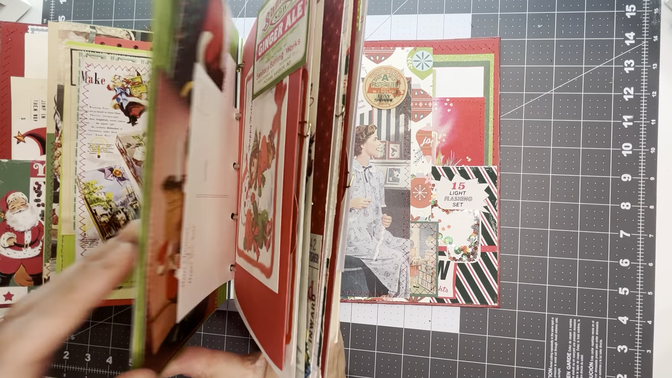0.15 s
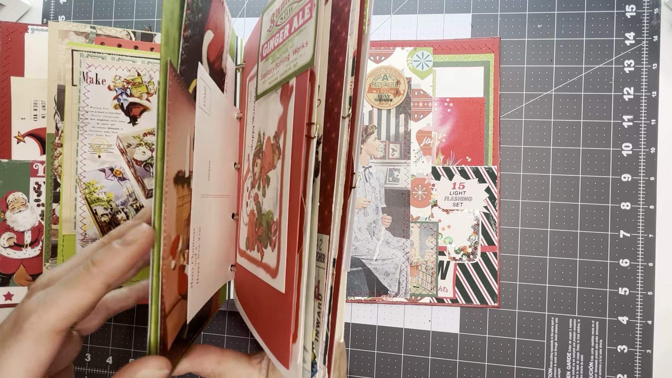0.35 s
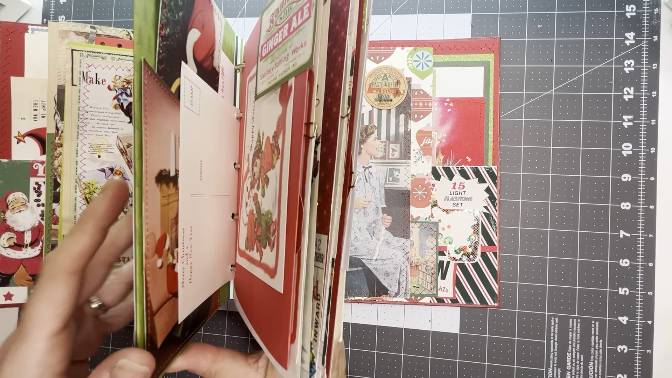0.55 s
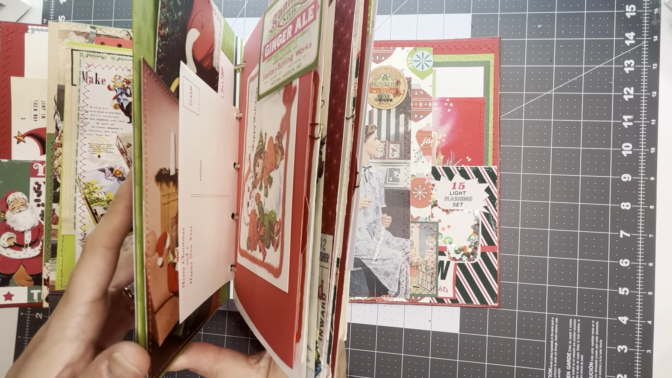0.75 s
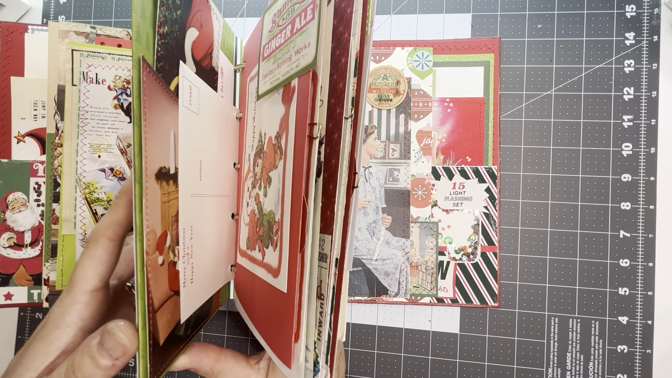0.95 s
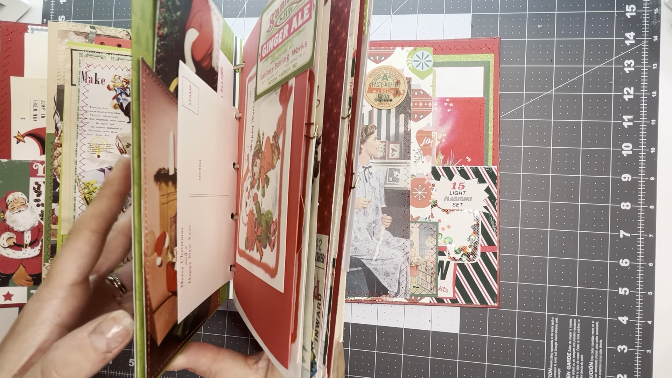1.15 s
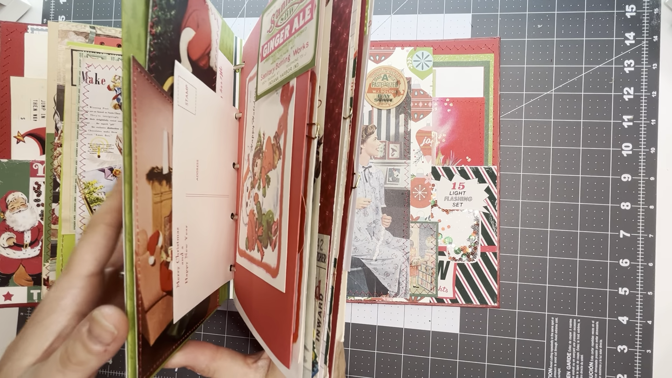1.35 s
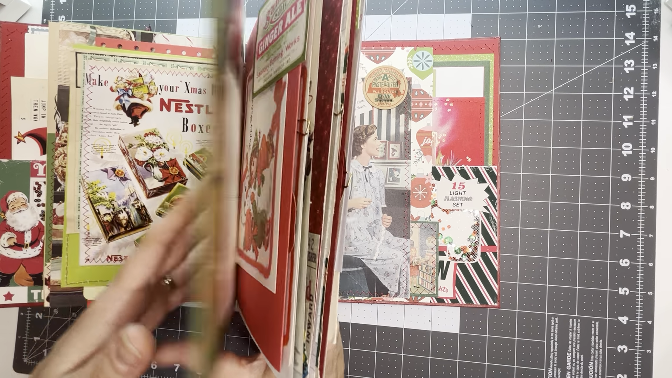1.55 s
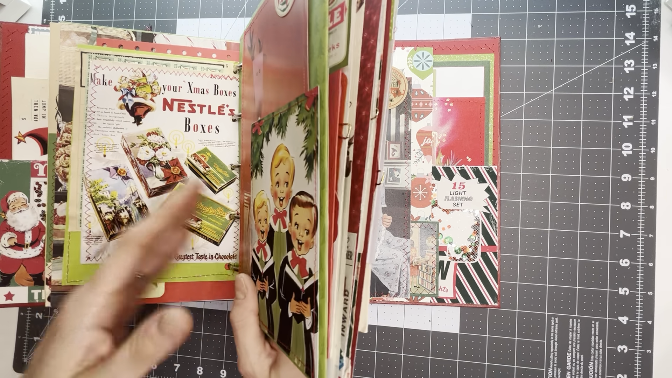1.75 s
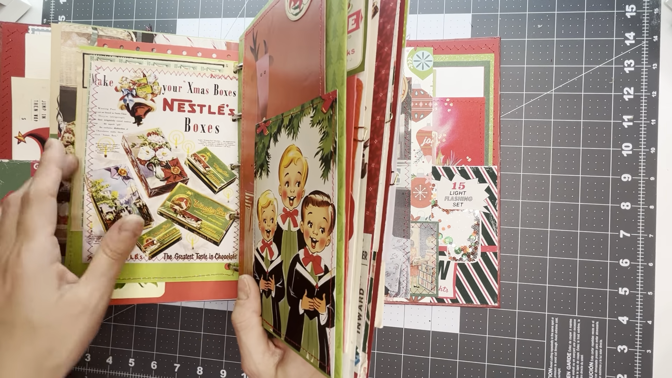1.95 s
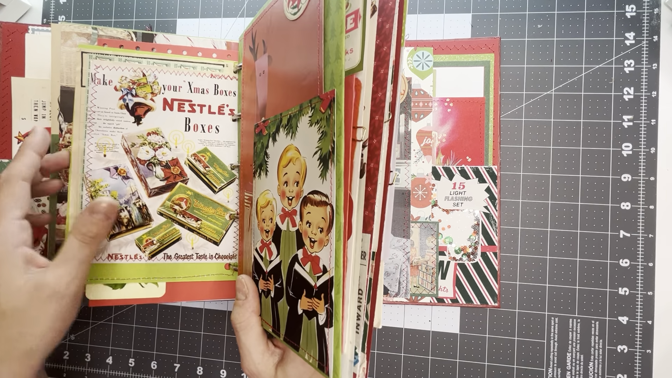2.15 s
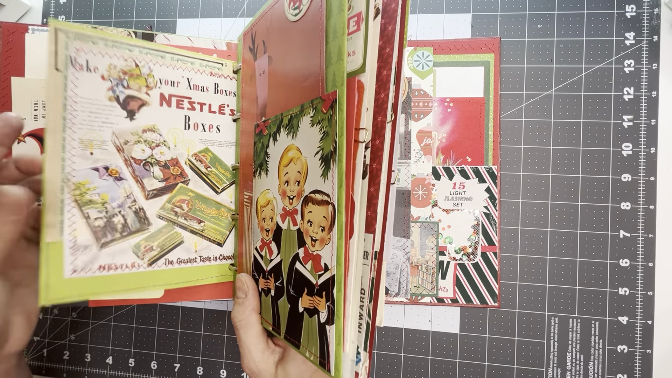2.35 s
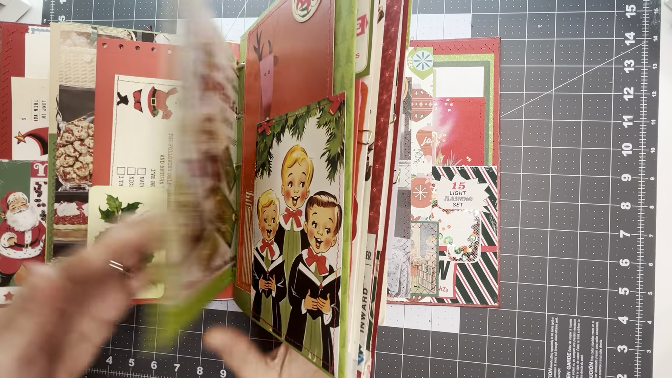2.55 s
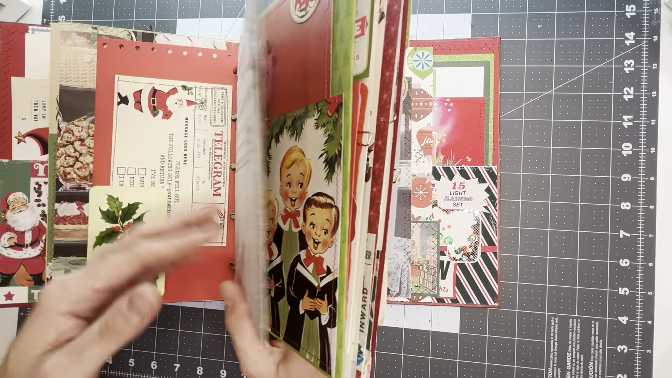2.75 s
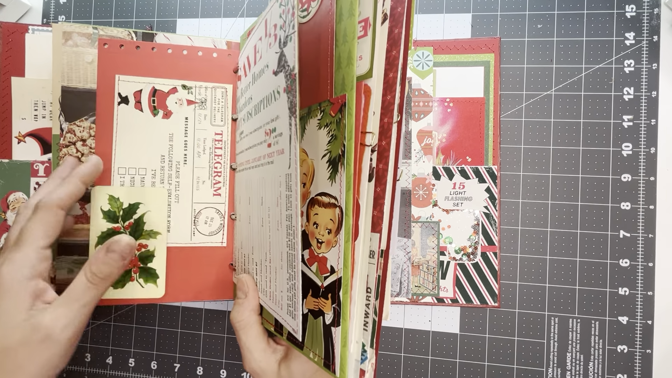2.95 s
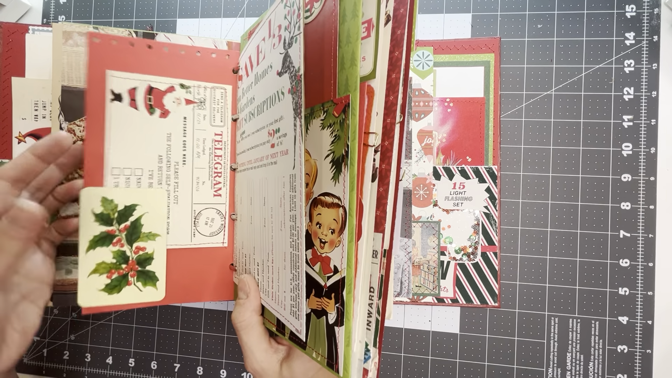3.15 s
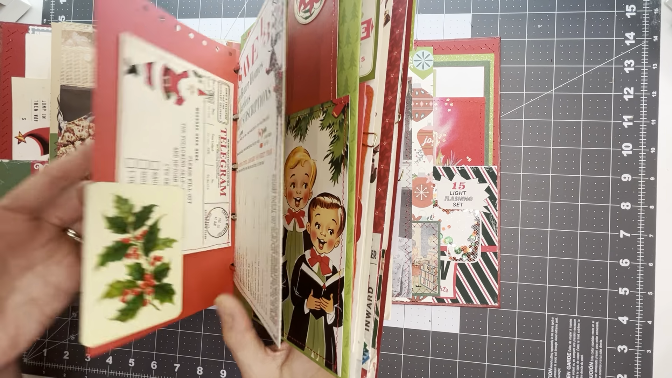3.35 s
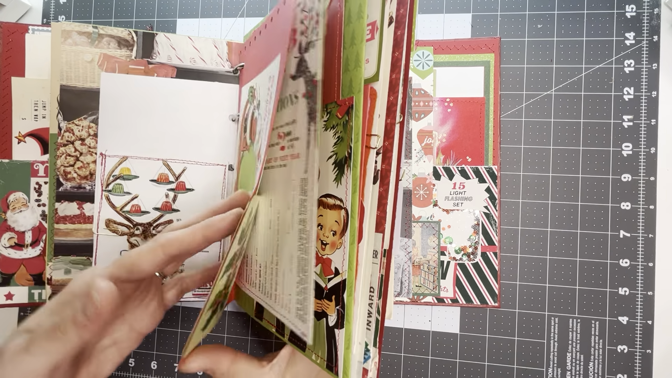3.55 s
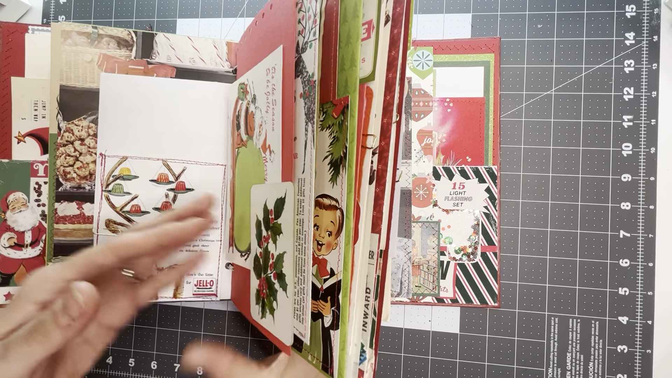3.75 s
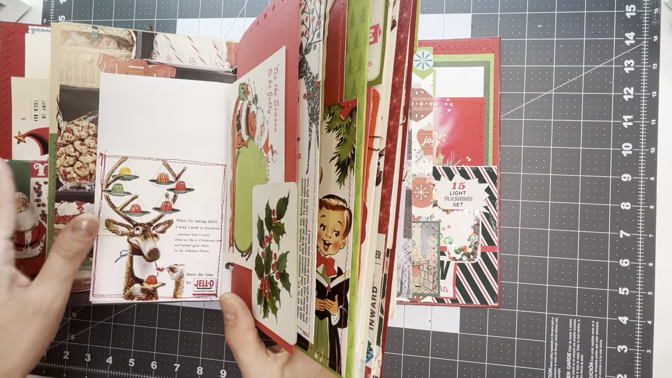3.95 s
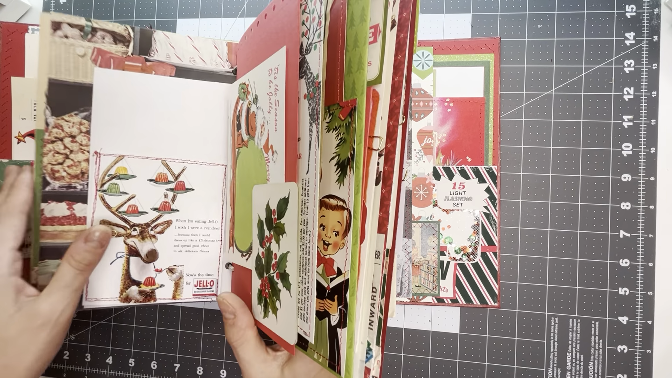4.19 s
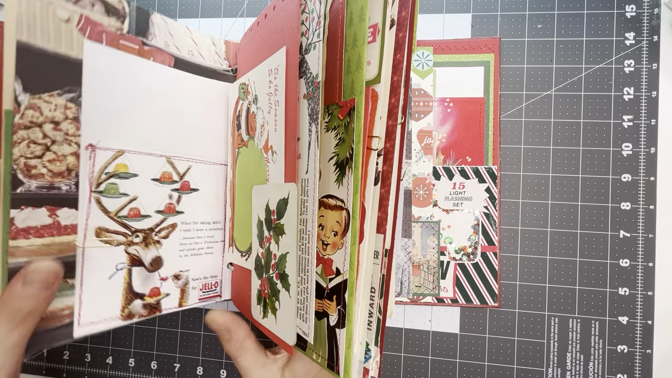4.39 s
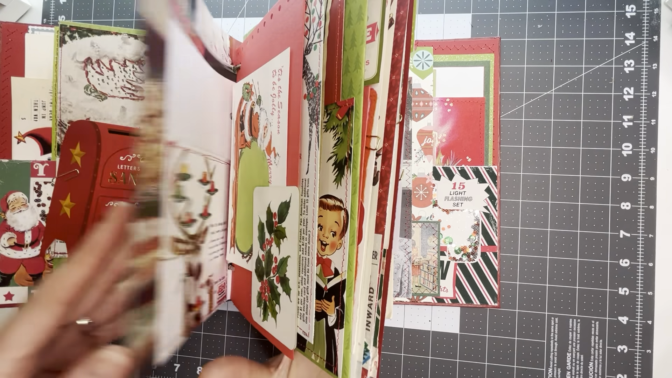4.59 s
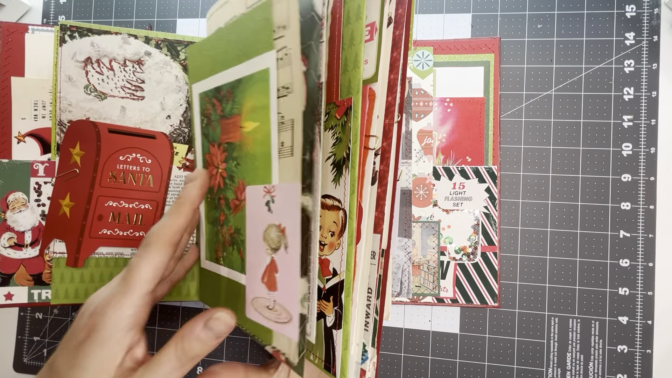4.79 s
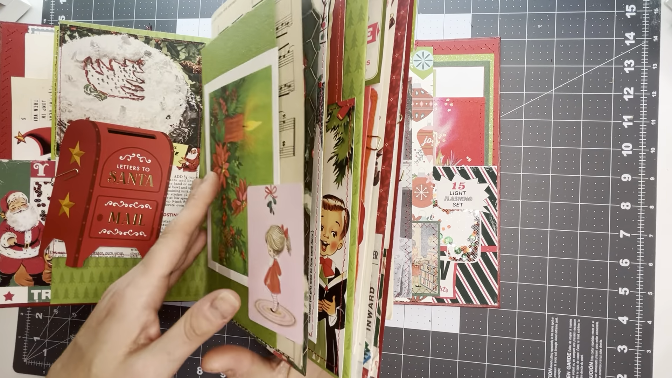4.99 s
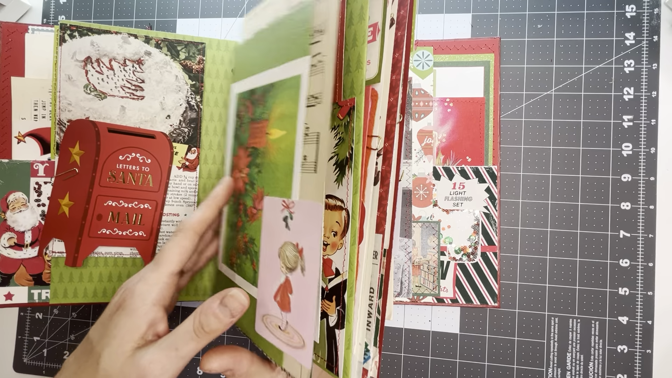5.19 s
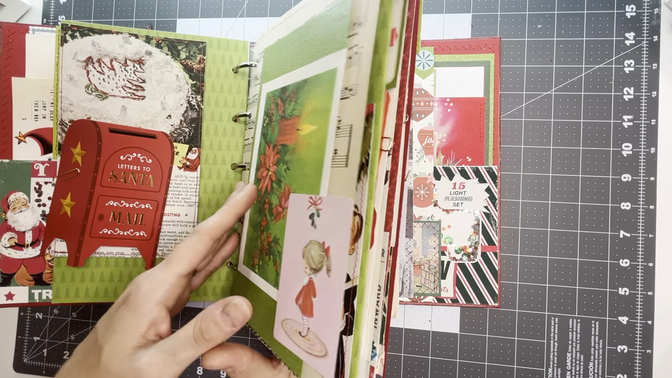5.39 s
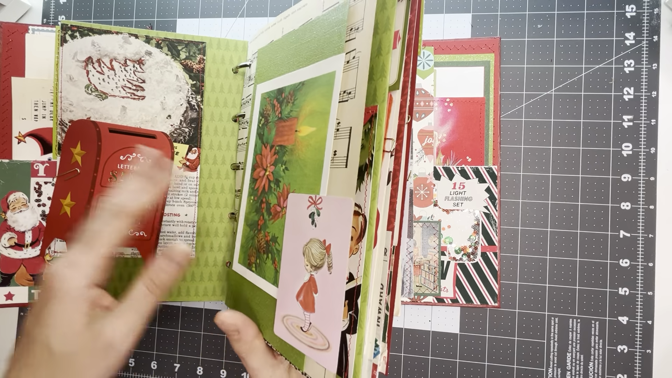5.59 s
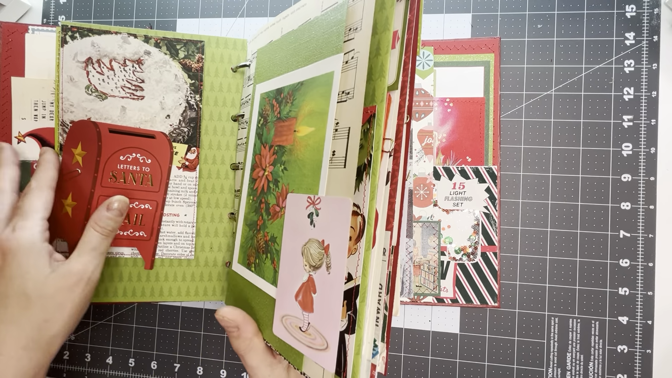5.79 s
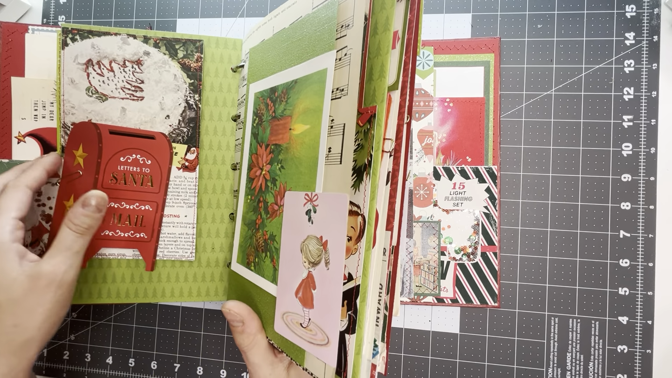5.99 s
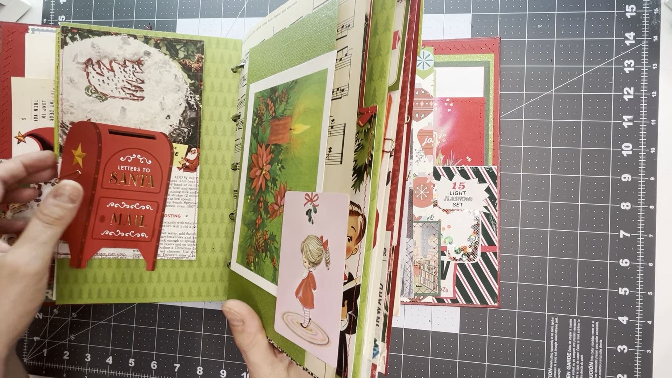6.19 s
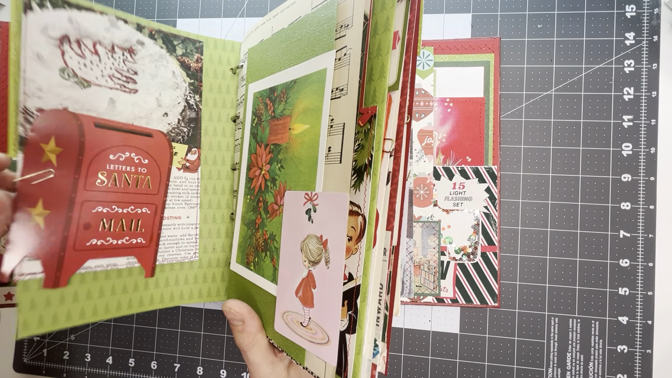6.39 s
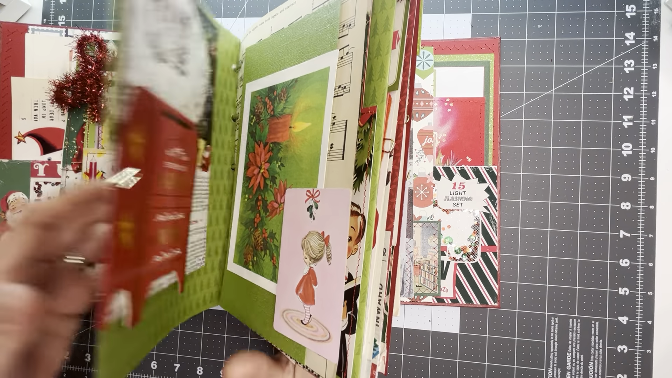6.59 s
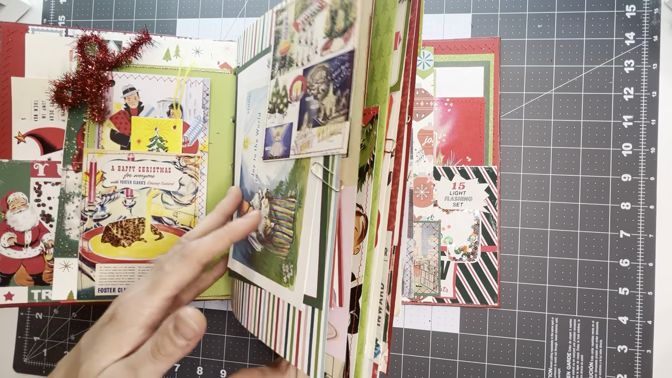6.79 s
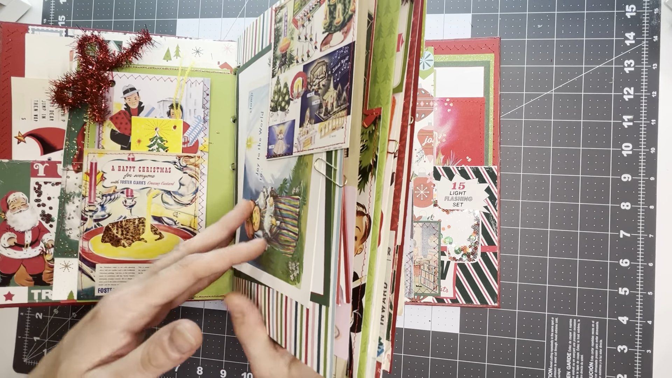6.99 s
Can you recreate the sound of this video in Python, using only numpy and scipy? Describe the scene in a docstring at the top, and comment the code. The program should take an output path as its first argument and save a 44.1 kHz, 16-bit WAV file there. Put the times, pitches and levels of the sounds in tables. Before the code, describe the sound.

Hands turn the paper and card pages of a ring binder on a table, heard close up in stereo. Right at the start a sheet slides and flicks free with a soft bump. Light handling follows, with small ticks and rustles from about 1 to 1.9 seconds. At 2.3 seconds comes the loudest moment: a page cracks sharply, slaps the stiff cover and thumps the tabletop, trailing into a short rustle. Sheets rub and flex again around 3.5 seconds and from 4.5 to 5.3 seconds, with little snaps, edge flicks and dull knocks on the table. A lull follows, holding only faint brushing and a few low bumps. Another page starts moving at about 6.4 seconds and lands at 6.7 in a quick flurry of snaps and hollow slaps. A quiet room's faint hum and hiss lie under everything.

```python
"""Hands turn the paper and card pages of a ring binder on a table, close to a pair of microphones.
A first sheet slides and flicks free, and light handling follows. At 2.3 s a page cracks, slaps the
cover and thumps the table top. Sheets rub and flex again around 3.5 s and from 4.5 to 5.3 s; after
a lull, a last flurry of snaps lands at 6.7 s. A quiet room's faint hum and hiss lie under it all."""
import sys
import numpy as np
from scipy import signal
from scipy.fft import rfft, irfft, next_fast_len
from scipy.io import wavfile
from scipy.ndimage import uniform_filter1d

SR = 44100
rng = np.random.default_rng(int(sys.argv[2]) if len(sys.argv) > 2 else 0)


def to_wav(s):
    """Save 16-bit WAV."""
    ch = np.atleast_2d(s).T  # columns
    pcm = np.round(np.clip(ch, -1, 1) * 32767)  # PCM
    wavfile.write(sys.argv[1], SR, pcm.astype(np.int16))


N = 310370

# One sheet slides on another; rise and fall are times per 20 dB, their signs ignored:
# hold_start_s, hold_s, level_db, rise_s, fall_s, bass_lift_db, treble_lift_db, presence_lift_db
STROKES = [(0.032, 0.0566, -59.5, -0.46, 0.1481, 3.5, 6, 8),
           (0.088, 0.03413, -53.5, 0.017, 0.0568, 1, 2, 10.5),
           (0.139, 0.01759, -43.5, 0.0408, 0.0497, 0, -0.5, 7.5),
           (0.174, 0.027, -47.5, 0.0522, 0.0164, 7.5, -0.5, 7),
           (0.266, 0.001062, -56.5, 0.183, 0.0428, 4, 0.5, 6),
           (0.414, 0.07587, -58.5, 0.1409, 0.0253, -5.5, -3, 1.5),
           (0.531, 0.0795, -72, 0.4441, 0.1843, -3.5, 11.5, -0.5),
           (0.601, 0.04908, -67, 0.0624, 0.1587, -4, 1, -0.5),
           (0.781, 0.03165, -68, 0.0746, 0.1829, 2.5, 2, 8.5),
           (0.845, 0.0776, -60, 0.0726, 0.0592, 4, 8, 3.5), (1.01, 0.0254, -52.5, 0.0061, 0.042, 5, 4, 2),
           (1.115, 0.00791, -53, 0.0342, 0.0142, 2.5, -3.5, 2),
           (1.136, 0.023385, -52.5, -0.0138, 0.0272, 5.5, -0.5, 5.5),
           (1.239, 0.03515, -65.5, -0.026, 0.019, -6, 6.5, 5),
           (1.29, 0.01477, -61.5, -0.0008, 0.1197, -12, 5, 2),
           (1.434, 0.00887, -53, 0.0262, 0.0692, 6.5, -2, 7),
           (1.485, 0.03568, -44, 0.0459, 0.0915, 1.5, 3, 6.5),
           (1.609, 0.02317, -54, 0.0229, 0.0552, 6, 15, 5),
           (1.649, 0.008146, -42.5, 0.0342, 0.0352, 9.5, 4.5, 7),
           (1.673, 0.0398, -62, 0.055, 0.0794, 13.5, 8, 7),
           (1.866, 0.01709, -69.5, 0.09, 0.0917, 3.5, 1.5, 2),
           (1.94, 0.0387, -75, 0.3641, -0.0042, 0, 3.5, -2),
           (2.049, 0.02812, -73, 0.2477, 0.0972, -2.5, 6, -2),
           (2.138, 0.0228, -66.5, 0.033, 0.075, 0, -5, 0),
           (2.163, 0.01328, -63.5, 0.0263, 0.0366, 5, 0.5, 7),
           (2.308, 0.00909, -52.5, 0.01, -0.0148, -2, -6.5, 3),
           (2.322, 0.001152, -32, 0.01, 0.0257, 3, -9.5, 3.5),
           (2.351, 0.000968, -56, 0.0365, 0.1864, 14.5, 3.5, 9.5),
           (2.478, 0.13984, -51, 0.0755, 0.038, 11, 4, 6.5),
           (2.758, .001, -72.5, 0.1673, -0.1543, 0.5, 6, -0.5),
           (2.848, 0.000948, -58, 0.0604, 0.0365, -0.5, 5, 3),
           (2.927, 0.01096, -69, -0.1891, 0.2175, 2, 2, -1),
           (2.972, 0.03015, -61, -0.1622, 0.1039, -11.5, -7.5, -5),
           (3.005, 0.0155, -54.5, 0.0255, 0.0198, -9.5, -6, 5.5),
           (3.171, 0.0406, -61.5, 0.0426, 0.0968, -3, 0.5, -0.5),
           (3.22, 0.02084, -56, 0.0685, 0.0562, 16.5, 3, 0),
           (3.303, 0.0271, -61, 0.0614, 0.1028, 13.5, 9, 4.5),
           (3.355, 0.000968, -46.5, 0.0304, 0.0737, -1, -11, -6),
           (3.434, 0.02467, -53, 0.0353, 0.1526, 10.5, 2, 6.5),
           (3.462, 0.03657, -46, -0.0011, -0.0339, 6, 1, 10),
           (3.496, 0.0228, -41.5, 0.0147, 0.0534, 2, 6.5, 8),
           (3.578, 0.03684, -42, -0.0004, 0.0473, 0.5, 7, 8.5),
           (3.544, 0.0467, -51.5, 0.0347, 0.0731, 11, 8.5, 6),
           (3.634, 0.05086, -54.5, 0.0472, 0.0237, 9.5, 3, 4),
           (3.996, 0.00097, -77.5, 0.4911, -0.3488, 1, 3, 0.5),
           (4.049, 0.00096, -67.5, -0.1306, 0.0194, -5, -5, 3.5),
           (4.094, 0.03136, -73, 0.076, 0.0976, 2.5, 15, 1.5),
           (4.198, 0.00096, -79.5, -0.4826, -4.0389, 5.5, 3, 4),
           (4.345, 0.09236, -62, -0.02, 0.1079, 13.5, 2.5, 11),
           (4.487, 0.0433, -58, 0.0644, 0.1863, 3, 7, 7.5),
           (4.557, 0.10512, -54.5, 0.0241, 0.0704, -0.5, 7, 9),
           (4.699, 0.000895, -51.5, 0.0681, 0.0286, 10, -0.5, 3),
           (4.749, 0.001005, -43, -0.0188, 0.0231, 1, 2.5, 4.5),
           (4.79, 0.0008545, -60.5, -0.0034, 0.1323, 7.5, 7, 12),
           (4.963, 0.0272, -62, 0.0062, 0.1463, 5.5, 8, 7),
           (5.018, 0.0418, -58.5, 0.0229, 0.1378, 9.5, 3.5, 7.5),
           (5.13, 0.03545, -50, 0.0126, 0.0969, 9.5, 1.5, 2.5),
           (5.184, 0.08265, -47, 0.0514, 0.0116, 6.5, 4, 6),
           (5.281, 0.033324, -54.5, 0.0325, 0.0165, 10, 10.5, 11),
           (5.349, 0.06687, -68.5, 0.0728, 0.0516, 17.5, 9.5, 4),
           (5.491, 0.08243, -75, 0.0223, -0.067, -7, 17, 10.5),
           (5.781, 0.01768, -74.5, -0.0388, -0.0583, 5.5, -3, 0.5),
           (5.832, 0.10132, -67.5, -0.1054, -0.0397, 1.5, 4.5, 1),
           (6.08, 0.01989, -79.5, -0.297, -0.0185, -6.5, 1, 4),
           (6.233, 0.00103, -69, 0.0258, 0.1992, 9.5, 2, -1),
           (6.267, 0.01778, -71.5, 0.0287, -0.7093, 9, 5.5, 4.5),
           (6.369, 0.02654, -63, -0.0052, 0.1012, 11.5, -0.5, 6.5),
           (6.432, 0.000997, -56, 0.0355, 0.0542, 11.5, -11.5, 5),
           (6.461, 0.1192, -62, -0.0145, 0.3307, 4, 8, 9),
           (6.597, 0.03863, -55, 0.0269, 0.1162, 9.5, 6.5, 6.5),
           (6.637, 0.0491, -50, -0.0035, 0.0552, 8.5, 3, 12.5),
           (6.685, 0.0516, -42, 0.0173, 0.0161, 7.5, 0, 15),
           (6.739, 0.02926, -50, -0.0218, 0.0568, 4.5, -5.5, 4),
           (6.821, 0.03999, -68, -0.0304, 0.1054, 2.5, 2.5, 12),
           (6.889, 0.09955, -77, -0.4239, -0.0862, -5.5, 19.5, 8)]
# Tone of rubbing paper: frequency_hz, relative_db
PAPER_TONE = [(150, -2.5), (300, -12), (530, 2), (720, -10), (960, 6.5), (1300, 3), (1800, 1.5), (2400, -3),
              (3400, -4.5), (4400, -1), (5600, -2.5), (7000, -8.5), (11000, -12), (16000, -16)]
# A sheet buckles or lands: start_s, level_db, pitch_hz, rattle_share
SNAPS = [(.107, -32.5, 1006, 0.15), (.1075, -29.5, 3381, 0.13), (.1424, -33, 2518, 0.38),
         (.146, -29, 941.4, 0.31), (.152, -36, 2092, 0.52), (0.9643, -50.5, 1056, 0.3),
         (1.0097, -50, 1703, 0.02), (1.1161, -48, 3552, .43), (1.163, -38, 987.5, 0.23),
         (1.4328, -41.5, 996.2, 0.61), (1.4809, -36, 1147, 0.47), (1.654, -32, 368.2, 0.8),
         (1.662, -32.5, 3410, 0.48), (1.7037, -36.5, 2826, .3), (1.867, -30.5, 2581, 0.04),
         (1.8728, -41.5, 2461, 0.09), (2.0509, -54, 3048, .3), (2.1622, -43.5, 1487, .4),
         (2.32, -15, 2507, .2), (2.3249, -7.5, 3262, 0.12), (2.3278, -22.5, 961.3, .33),
         (2.4472, -40, 534.6, .4), (2.4632, -34, 572.8, 0.08), (2.4805, -31.5, 1025, 0.4),
         (2.5086, -34.5, 908, .54), (2.6177, -34, 716.4, 0.32), (2.618, -37, 1597, 0.12),
         (2.754, -56.5, 1370, 0.44), (2.8431, -48.5, 1780, 0.19), (2.9232, -57.5, 2720, 0.35),
         (3.011, -43.5, 2770, 0.06), (3.1102, -56, 875, 0.31), (3.2282, -35, 559, .42),
         (3.229, -44.5, 1399, 0.09), (3.245, -38.5, 1291, 0.26), (3.28, -50, 1398, 0.15),
         (3.312, -44, 1159, 0.49), (3.3528, -36, 2707, 0.39), (3.46, -39, 933.4, .7),
         (3.4787, -30, 2446, 0.53), (3.501, -26.5, 2876, 0.63), (3.582, -34.5, 2254, .2),
         (3.6821, -35.5, 528, 0), (4.037, -51, 3074, 0.42), (4.0931, -53, 2650, 0.39),
         (4.3583, -44.5, 964.1, 0.71), (4.3742, -42.5, 935, 0.71), (4.5886, -35.5, 1052, 0.55),
         (4.61, -37.5, 1451, 0.26), (4.635, -32, 2541, 0.47), (4.6949, -30.5, 1448, 0),
         (4.7448, -30, 1128, 0.1), (4.748, -35, 1176, .6), (4.7527, -41.5, 1186, 0.75),
         (4.7681, -33.5, 1104, 0.35), (4.9665, -40.5, 976.6, 0.32), (5.0307, -32.5, 984, 0.24),
         (5.1277, -45.5, 1004, 0.53), (5.159, -36.5, 1040, 0.43), (5.189, -37, 1092, 0.54),
         (5.254, -39, 1112, 0.57), (5.2858, -41, 478.8, 0.61), (5.2934, -41.5, 535, 0.23),
         (5.7519, -59, 949.8, 0.39), (5.843, -51.5, 2690, 0.77), (6.2323, -49.5, 994, 0.06),
         (6.428, -39.5, 1818, 0.06), (6.4448, -29, 450.2, 0.16), (6.637, -37.5, 2480, 0.31),
         (6.668, -34.5, 2278, 0.8), (6.687, -29.5, 1812, 0.35), (6.7058, -15.5, 2583, .15),
         (6.718, -24, 3437, 0.27), (6.724, -28.5, 3398, .4), (6.7385, -19.5, 3529, 0.34),
         (6.742, -25.5, 2201, 0.59), (6.751, -23.5, 604.1, 0.16)]
# An edge flicks past a finger or another edge: start_s, level_db, centre_hz
EDGE_TICKS = [(0.142, -32, 5128), (0.203, -47.5, 5620), (.782, -59, 5140), (0.795, -54.5, 5220),
              (1.011, -45, 6030), (1.118, -40.5, 4054), (1.3058, -46.5, 4910), (1.527, -49.5, 5490),
              (1.5482, -38, 5180), (1.6178, -37.5, 10280), (1.6621, -51.5, 5280), (1.7041, -43.5, 6757),
              (1.8228, -53.5, 4093), (1.8662, -44.5, 5112), (1.926, -66.5, 4228), (2.32, -24, 5062),
              (2.4637, -39.5, 4297), (2.4816, -40, 5618), (2.5137, -36, 3888), (2.616, -43, 5481),
              (2.7547, -52.5, 6930), (2.843, -44, 9850), (2.848, -49, 5941), (2.8518, -53, 11370),
              (2.924, -56.5, 12510), (3.106, -61, 11930), (3.2432, -51.5, 4590), (3.3538, -43.5, 4560),
              (3.439, -45.5, 6760), (3.4603, -38.5, 7584), (3.862, -66, 7500), (3.869, -64, 6981),
              (3.8752, -62, 5486), (4.045, -55, 4594), (4.0702, -59, 4054), (4.0953, -54, 7190),
              (4.1663, -70.5, 5810), (4.197, -66.5, 6001), (4.2113, -65, 10480), (4.2277, -61, 11340),
              (4.358, -46.5, 8580), (4.3749, -43, 8379), (4.554, -54.5, 6000), (4.635, -44, 9070),
              (4.694, -34, 4313), (4.737, -44.5, 10990), (4.744, -43, 4400), (4.753, -49, 4160),
              (4.7694, -38, 5522), (5.031, -56, 5490), (5.189, -51.5, 5060), (5.2887, -37.5, 5636),
              (5.394, -58, 5000), (5.5806, -63, 9820), (5.7457, -61.5, 12100), (5.842, -57, 5750),
              (6.082, -58, 7230), (6.5028, -48.5, 4885), (6.739, -47, 5327), (6.7414, -47.5, 5340),
              (6.748, -46.5, 5200), (6.9904, -59, 5705)]
# Pages slap the stiff cover: start_s, level_db
COVER_SLAPS = [(.144, -36.5), (1.65, -56), (2.322, -29), (2.513, -30), (3.229, -45), (3.499, -40),
               (3.563, -38.5), (5.189, -40.5), (5.258, -40), (6.69, -35), (6.722, -26.5), (6.749, -26.5),
               (6.79, -45)]
# Ring of the cover board: pitch_hz, relative_db, t60_s
COVER_MODES = [(530, 0, .055), (345, -8, .06), (940, -10, .04)]
# A hand or page knocks the table: start_s, level_db, main_pitch_hz, t60_s, upper_modes_db
THUMPS = [(.159, -36, 108.3, 0.1656, -11.5), (1.067, -40, 118.2, 0.1744, -5.5),
          (1.165, -47, 90.87, 0.1414, 1), (1.461, -43.5, 99.8, 0.1629, -10), (1.66, -35, 114.4, 0.1989, -5),
          (1.985, -52, 98.6, 0.209, -17), (2.166, -35.5, 89.7, 0.1613, -8.5),
          (2.341, -25.5, 113.1, 0.14957, 3.5), (2.488, -38, 120.6, 0.2496, -7),
          (2.53, -40.5, 113, 0.1162, -2.5), (2.929, -44.5, 106.3, 0.1357, -10),
          (3.026, -37.5, 107.2, 0.1415, -19.5), (3.114, -52, 106.7, .18, -18.5),
          (3.218, -44, 121.5, 0.23935, -3), (3.497, -42, 80.75, 0.36, -18.5),
          (3.548, -37.5, 110.9, 0.092, -20), (3.636, -43, 113, 0.2883, -5),
          (4.052, -38.5, 106.8, 0.2446, -12.5), (4.475, -50.5, 107.4, 0.1155, -8),
          (4.755, -47.5, 107.6, 0.2477, -12), (5.017, -41.5, 107.2, 0.0934, -5.5),
          (5.176, -46, 97.83, 0.1737, 2.5), (5.298, -40.5, 110.3, 0.1174, -8.5),
          (5.37, -44.5, 101, 0.1947, -8), (5.402, -38.5, 97.14, 0.2187, -9),
          (5.44, -43.5, 97.2, 0.19195, -9.5), (5.5, -50, 100.6, 0.1679, -11),
          (5.766, -50, 111.7, 0.3078, -15), (5.845, -33, 113.7, 0.1922, -16.5),
          (5.92, -47.5, 92.6, 0.16794, -4), (6.115, -50, 105.2, 0.145, -26.5),
          (6.447, -31.5, 105.8, 0.13528, 0), (6.585, -45, 101.2, 0.2805, -15),
          (6.757, -36, 113.1, 0.13434, -3.5)]
# Table-top modes besides the main one: pitch_hz, relative_db, t60_factor
TABLE_MODES = [(55.2, -2, 2.8), (198.42, 3.5, 0.5762), (252.14, 8, 0.282), (328.52, -12.5, 0.92),
               (533.28, -31, 1.3)]
# The table trembles under the hands: time_s, level_db
TREMBLE_LEVEL = [(0, -77), (.15, -54.5), (.31, -62.5), (.66, -72), (.86, -63), (1.7, -70.5), (2.0, -66),
                 (2.3, -66), (2.53, -47), (2.71, -62), (3.4, -57), (3.9, -72), (4.31, -64.5), (5.05, -74),
                 (5.37, -59.5), (5.9, -75), (6.6, -56.5), (6.88, -63.5), (7.04, -83)]
# Broad resonances of the table: centre_hz, width_hz, relative_db
TREMBLE_BANDS = [(52.18, 16, -3), (89, 14, -5.5), (112.08, 22.3, 4), (228.24, 58, -6.5)]
# Wavering hum tones: pitch_hz, wander_hz, base_level_db, change_over_scene_db
HUM_TONES = [(83.419, 1.6, -67.5, -1), (103.14, 1.5, -60.5, -9), (175.32, 1.5, -69, 2.5),
             (328.64, 4.8, -87.5, 4)]
# Fader ride on the whole hum: time_s, gain_db
HUM_RIDE = [(0, -3.5), (.55, -0.5), (.8, -1), (1.3, -5), (1.6, 0), (2, -4), (2.9, -2.5), (3.4, 1),
            (4.2, -11), (4.8, -1.5), (5.5, -13.5), (6.2, -10.5), (7.04, -8)]
# Tone of the room's hiss: frequency_hz, relative_db
HISS_TONE = [(30, -7.5), (100, -6.5), (200, -17), (330, -18), (500, -30.5), (900, -32), (1300, -28.5),
             (1700, -14.5), (2000, -27.5), (2400, -28), (5500, -32.5), (7500, -38.5), (16000, -37.5)]
# Reverb time of the room: frequency_hz, t60_s
ROOM_DECAY = [(200, 0.32), (1000, 0.17), (4000, 0.24), (12000, 0.16)]
# Phase between the microphones: frequency_hz, left_lead_rad
LEFT_LEAD = [(0, 0), (300, 1.2187), (600, 0.5), (900, -.5), (1250, 1.5), (2000, 0.5), (2600, 2.5),
             (4000, 3.5), (5800, 2.5), (8100, 7), (10300, 9.5), (12600, 13.5), (15000, 16), (16500, 16.5)]
# How alike the two sides sound, from 0 to 1: frequency_hz, likeness
STEREO_LIKENESS = [(60, 1), (250, 0.96), (600, 0.45), (1000, 0.4), (2500, 0.49), (3600, 0.41), (5500, 0.77),
                   (8500, 0.6), (10300, .95), (11500, 0.8), (12600, 0.77), (13600, 0.7), (15000, 0.91),
                   (16000, 0.98)]
# Stereo balance: frequency_hz, left_minus_right_db
BALANCE = [(60, 1.5), (300, -4), (800, -1), (1200, 0.3717), (2600, -1.5), (3600, -4.5), (5000, 0),
           (6500, -0.5)]


def gain_of(db):
    """Decibels to amplitude."""
    return 10 ** (np.asarray(db) / 20)


def unit_rms(x):
    """Scales to rms 1."""
    return x / np.sqrt(np.mean(x ** 2) + 1e-20)


def curve_at(points, hz):
    """Reads a curve on a log-frequency axis."""
    point_hz, value = np.transpose(points)
    return np.interp(np.log(hz + 1), np.log(point_hz + 1), value)


def add(mix, start_s, sound):
    """Mixes a sound in at start_s."""
    part = mix[..., round(start_s * SR):][..., :sound.shape[-1]]
    part += sound[..., :part.shape[-1]]


def resonate(x, hz, width_hz):
    """A two-pole resonance of gain 1."""
    return signal.lfilter(*signal.iirpeak(hz, hz / width_hz, SR), x)


def filtered(x, response):
    """Multiplies the whole spectrum by response(hz)."""
    size = next_fast_len(N + 4096)
    return irfft(rfft(x, size) * response(np.fft.rfftfreq(size, 1 / SR)), size)[..., :N]


def drift(seconds):
    """A smooth random wander of rms 1."""
    size = max(round(seconds * SR), 1)
    return unit_rms(uniform_filter1d(uniform_filter1d(rng.standard_normal(N), size), size))


def sheet_strokes(t, creep_db=-95, edge_lifts_db=(1.5, 1, 1)):
    """Strokes swell, hold and fade over a faint creep. Gives gain and three EQ lifts, led by the loudest."""
    start, hold, db, rise, fall, *lifts_db = np.transpose(STROKES)[..., None]
    early_s = np.maximum(start - t, 0)
    late_s = np.maximum(t - start - abs(hold), 0)
    fade = early_s / abs(rise) + late_s / abs(fall)  # in steps of 20 dB below the hold
    power = gain_of(db - 20 * fade) ** 2
    total = power.sum(0) + gain_of(creep_db) ** 2
    lifts_db = [lift + per_step * fade for lift, per_step in zip(lifts_db, edge_lifts_db)]
    return np.sqrt(total), [(power * lift).sum(0) / total for lift in lifts_db]


def sheet_rubbing(slips_per_s=1500, spread_db=3.0, smooth_share=0.7377, clump_db=1.5, patchy_db=2.5):
    """Paper slides on paper: tiny slips in clumps over a smooth hiss, coloured by the moving sheet."""
    slip_sizes = gain_of(spread_db * np.minimum(rng.exponential(1, N), 5))
    slips = slip_sizes * (rng.random(N) < slips_per_s / SR)
    grain = unit_rms(signal.lfilter([1], [1, -.93], slips))  # a tiny tail on each slip
    texture = (smooth_share + (1 - smooth_share) * grain) * gain_of(clump_db * drift(0.011))
    friction = unit_rms(texture * rng.standard_normal((2, N)))
    hz, t, spectrum = signal.stft(friction, SR, nperseg=256, noverlap=192)
    patches = uniform_filter1d(rng.standard_normal(spectrum.shape[1:]), size=3, axis=0)
    patches = unit_rms(uniform_filter1d(patches, size=30, axis=1))  # the colour flickers
    bass = 1 / (1 + (hz / 900) ** 4)
    treble = 1 / (1 + (5500 / (hz + 1)) ** 4)
    presence = np.exp(-(np.log((hz + 1) / 3000) / 0.3042) ** 2)
    stroke_gain, lifts_db = sheet_strokes(t)
    eq_db = sum(np.outer(band, db) for band, db in zip([bass, treble, presence], lifts_db))
    paper = unit_rms(gain_of(curve_at(PAPER_TONE, hz)))
    spectrum = spectrum * paper[:, None] * gain_of(eq_db + patchy_db * patches)
    rub = signal.istft(spectrum, SR, nperseg=256, noverlap=192)[1][:, :N]
    return rub * np.interp(np.arange(N) / SR, t, stroke_gain)


def sheet_snaps(q=1.4, rise_s=.0002, ring_cycles=13, bite=.8, bite_s=.0012, rattle_t60_s=0.04437):
    """A buckling sheet rings a few cycles at one pitch; a slack one rattles around that pitch."""
    out, t = np.zeros((2, N)), np.arange(6000) / SR
    noises = rng.standard_normal((len(SNAPS), 2, len(t)))
    phases = rng.random((len(SNAPS), 2, 1))
    attack = (1 - np.exp(-t / rise_s)) * (1 + bite * np.exp(-t / bite_s))  # the front cracks hardest
    for (start_s, db, hz, rattle_share), noise, phase in zip(SNAPS, noises, phases):
        decay = gain_of(-60 * t * hz / ring_cycles)  # card damps high pitches sooner
        ring = np.sin(2 * np.pi * (hz * t + phase)) * decay
        rattle = unit_rms(resonate(noise, hz, hz / q)) * gain_of(-60 * t / rattle_t60_s)
        snap = (1 - rattle_share) * ring + rattle_share * rattle
        add(out, start_s, gain_of(db) * snap * attack)
    return out


def edge_ticks(q=1.4, t60_s=0.012):
    """A page edge flicks free: a wide, bright burst, over in a few milliseconds."""
    out, t = np.zeros((2, N)), np.arange(3000) / SR
    noises = rng.standard_normal((len(EDGE_TICKS), 2, len(t)))
    for (start_s, db, hz), noise in zip(EDGE_TICKS, noises):
        burst = unit_rms(resonate(noise, hz, hz / q))
        add(out, start_s, gain_of(db - 60 * t / t60_s) * burst)
    return out


def cover_slaps(rise_s=.003):
    """The cover board answers a landing page with a short, hollow ring."""
    out, t = np.zeros((2, N)), np.arange(8000) / SR
    attack = 1 - np.exp(-t / rise_s)
    phases = rng.random((len(COVER_SLAPS), 2, 1))
    for (start_s, db), phase in zip(COVER_SLAPS, phases):
        ring = sum(gain_of(mode_db - 60 * t / t60_s) * np.sin(2 * np.pi * (hz * t + phase))
                   for hz, mode_db, t60_s in COVER_MODES)
        add(out, start_s, gain_of(db) * ring * attack)
    return out


def table_thumps(rise_s=0.0095, hold_s=0.023725, main_t60_factor=0.7366, main_db=-4.5, deep_db=-12):
    """A soft blow swells into the table's low modes; the main one holds a few cycles, then dies fast."""
    out, t = np.zeros(N), np.arange(20000) / SR
    attack = 1 - np.exp(-(t / rise_s) ** 2)
    for start_s, db, main_hz, t60_s, upper_db in THUMPS:
        decay_db = 60 * np.maximum(t - hold_s, 0) / (main_t60_factor * t60_s)
        ring = np.sin(2 * np.pi * main_hz * t) * gain_of(main_db - decay_db)
        for hz, mode_db, t60_factor in TABLE_MODES:
            strike_db = mode_db + (deep_db if hz < main_hz else upper_db)
            ring += np.sin(2 * np.pi * hz * t) * gain_of(strike_db - 60 * t / (t60_factor * t60_s))
        add(out, start_s, gain_of(db) * ring * attack)
    return out


def table_tremble():
    """The hands stir the table's broad, low resonances into a soft rumble."""
    noise = rng.standard_normal((2, N))
    rumble = sum(gain_of(db) * unit_rms(resonate(resonate(noise, hz, width_hz), hz, width_hz))
                 for hz, width_hz, db in TREMBLE_BANDS)
    level_db = np.interp(np.arange(N) / SR, *np.transpose(TREMBLE_LEVEL))
    return unit_rms(rumble) * gain_of(level_db)


def room_reverb(x, send_db=-12.5, tap_gap=20):
    """The room scatters the sound: sparse echoes of random sign, each band dying at its own speed."""
    taps = np.zeros((2, SR // 2))
    slots = np.arange(200, SR // 2 - tap_gap, tap_gap)  # in samples
    arrivals = slots + rng.integers(0, tap_gap, (2, len(slots)))
    np.put_along_axis(taps, arrivals, rng.choice([-1., 1.], arrivals.shape), 1)
    hz, t, spectrum = signal.stft(taps, SR, nperseg=256)
    decay = gain_of(-60 * t / curve_at(ROOM_DECAY, hz)[:, None])
    tail = signal.istft(spectrum * decay, SR, nperseg=256)[1]
    return gain_of(send_db) * signal.fftconvolve(x, tail / np.linalg.norm(tail[0]), axes=1)[:, :N]


def room_hum(waver_db=3.5):
    """A bed of faint, low tones that wander in pitch and level."""
    tones, t = np.zeros(N), np.arange(N) / SR
    for hz, wander_hz, db, change_db in HUM_TONES:
        level_db = db + change_db * t / t[-1] + waver_db * drift(0.11)
        pitch_hz = hz + wander_hz * drift(.2)
        tones += gain_of(level_db) * np.sin(2 * np.pi * np.cumsum(pitch_hz) / SR)
    return np.sqrt(2) * tones * gain_of(np.interp(t, *np.transpose(HUM_RIDE)))


def room_hiss(level_db=-75.5, swell_db=.5):
    """The soft, nearly steady air of the room."""
    hiss = filtered(rng.standard_normal((2, N)), lambda hz: gain_of(curve_at(HISS_TONE, hz)))
    return gain_of(level_db + swell_db * drift(.1)) * unit_rms(hiss)


def scene():
    """Pages, table and room in two rows: what both microphones share, and what only the right hears."""
    pages = sheet_rubbing() + sheet_snaps() + edge_ticks() + cover_slaps()
    return pages + room_reverb(pages) + table_thumps() + table_tremble() + room_hum() + room_hiss()


def record(dry, low_cut_hz=41.76, high_cut_hz=15750):
    """A close microphone pair: balance, phase and width vary with frequency; both extremes roll off."""
    likeness = lambda hz: np.clip(curve_at(STEREO_LIKENESS, hz), 0, 1)
    lag = lambda hz: np.exp(-1j * np.interp(hz, *np.transpose(LEFT_LEAD)))
    left = filtered(dry[0], lambda hz: gain_of(curve_at(BALANCE, hz) / 2))
    shared = filtered(dry[0], lambda hz: likeness(hz) * lag(hz))
    right_only = filtered(dry[1], lambda hz: np.sqrt(1 - likeness(hz) ** 2))
    right = filtered(shared + right_only, lambda hz: gain_of(-curve_at(BALANCE, hz) / 2))
    low_cut = signal.butter(3, low_cut_hz, btype="high", fs=SR, output="sos")
    pair = signal.sosfilt(low_cut, [left, right])  # small capsules lose the deepest bass
    high_cut = signal.firwin(511, high_cut_hz, window=("kaiser", 9), fs=SR)
    return signal.oaconvolve(pair, high_cut[None], "same")


dry = scene()
out = record(dry)
to_wav(out)
```